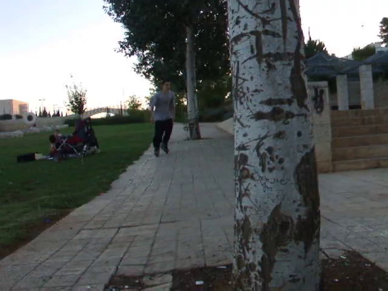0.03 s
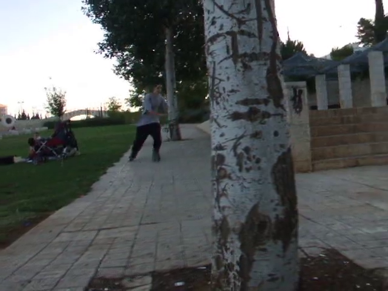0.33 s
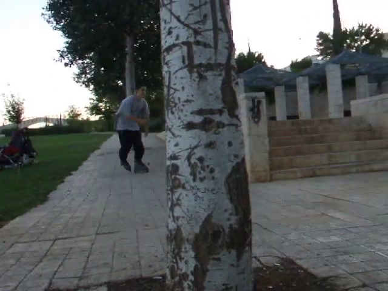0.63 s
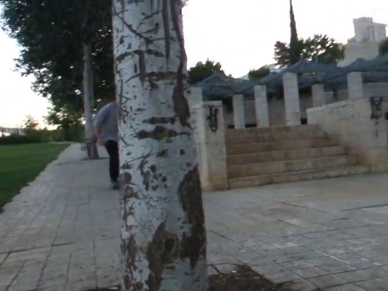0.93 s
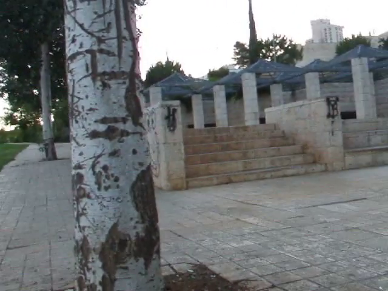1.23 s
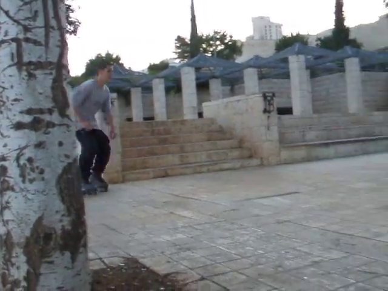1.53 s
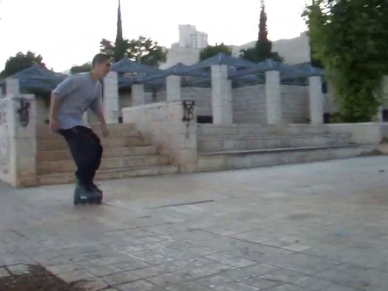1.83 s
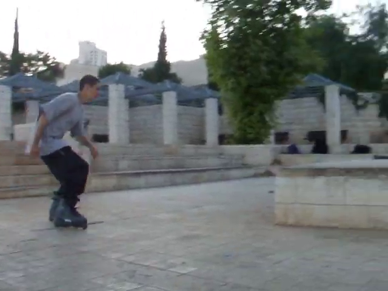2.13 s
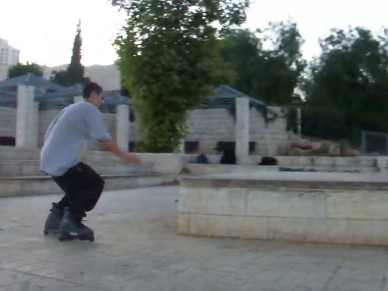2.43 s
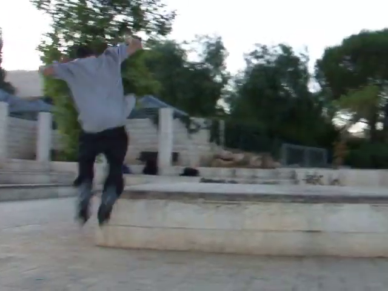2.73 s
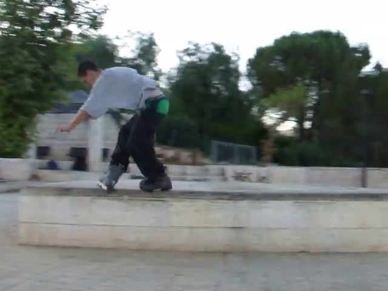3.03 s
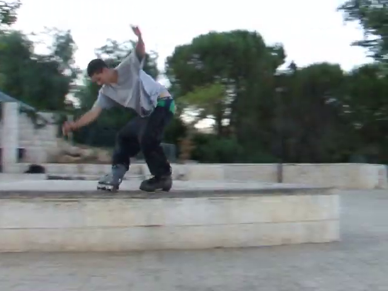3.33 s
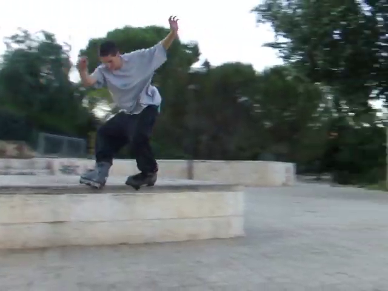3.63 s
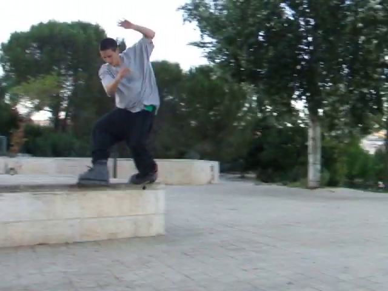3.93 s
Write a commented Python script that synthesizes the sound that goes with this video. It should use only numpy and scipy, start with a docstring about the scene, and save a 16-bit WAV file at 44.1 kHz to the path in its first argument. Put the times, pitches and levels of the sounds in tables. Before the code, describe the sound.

Inline skates roll closer over gritty stone paving, clacking on the joints, then jump, thump onto a stone ledge and scrape along it. Outdoors, light wind gusts rumble on the microphone.

```python
"""Outdoor air and a faint camera whine, then inline skates rolling closer over stone paving.
Wheels rush over grit and clack on the joints, ringing frame and boot; gusts rumble on the microphone.
The skater jumps with a wheel squeak, knocks his skates together and thumps onto a stone ledge.
He grinds along it: tiny slips ring the plastic boots, grit hisses. Low walls answer faintly."""
import sys
import numpy as np
from scipy import signal
from scipy.fft import rfft, irfft, next_fast_len
from scipy.io import wavfile
from scipy.ndimage import map_coordinates

SR = 44100
rng = np.random.default_rng(int(sys.argv[2]) if len(sys.argv) > 2 else 0)


def wav_out(sig):
    """Save sig, one row per channel (or a flat mono array), as 16-bit PCM at SR to the path in sys.argv[1]."""
    wavfile.write(sys.argv[1], SR, np.round(np.clip(np.atleast_2d(sig).T, -1, 1) * 32767).astype(np.int16))


N = 176400

# wind gusts (time [s], half width [s], level [dB])
WIND_GUSTS = [(.6, .085, -28.5), (.89, .07, -36), (1.17, .1, -31), (1.48, .1, -29.5), (2.05, .45, -34),
              (2.44, .06, -24), (2.6, .14, -33)]
# camera tones (frequency [Hz], level [dB])
WHINE_TONES = [(7868, -55.5), (8133, -57)]
# wheel roll envelope (time [s], relative level [dB])
ROLL_ENVELOPE = [(.2, -46.5), (.29, -40), (.76, -44.5), (.83, -36.5), (1.0, -42.5), (1.33, -42),
                 (1.47, -31), (1.55, -40), (1.76, -34), (1.86, -28), (2.01, -38.5), (2.22, -37.5),
                 (2.29, -26), (2.36, -36.5), (2.67, -34), (2.78, -42.5), (3.05, -53.5)]
# light wheel ticks (time [s], relative level [dB])
WHEEL_TICKS = [(.355, -26), (.672, -25), (.863, -19), (1.078, -22), (1.121, -24), (1.217, -21),
               (1.388, -21), (1.459, -19), (1.471, -18), (1.962, -16), (2.162, -17), (2.39, -17.5),
               (2.711, -19), (2.729, -16.5), (2.769, -18.5)]
# dull bumps in the push stroke (time [s], level [dB])
PUSH_BUMPS = [(.562, -30), (.581, -24.5), (.613, -28), (.637, -29), (.701, -27)]
# joints, jump, landing (time [s], base level [dB], knock offset [dB], thud offset [dB])
SKATE_BLOWS = [(0.2662, -20.5, -10.5, -18), (1.8032, -14.5, -30, -13.5), (1.82, -10, -36, -40),
               (1.9016, -18.5, -2, -20), (1.9105, -21.5, 3, -9.5), (2.0453, -15.5, -18, -14),
               (2.139, -11.5, -13, -8.5), (2.1475, -16.5, -5.5, -24), (2.257, -13, -7, -6),
               (2.2674, -21.5, -3, -1), (2.2751, -18.5, -7, -4), (2.8281, -2, -27.5, -36),
               (2.9547, -7, -22, -20.5), (2.9619, -8.5, -12, -37), (2.9949, -7, -25, -19.5),
               (3.0112, -12.5, -39, -32), (3.0229, -4, -28, -25), (3.0374, -9, -18.5, -32)]
# wheel squeaks (time [s], length [s], start pitch [Hz], level [dB])
WHEEL_SQUEAKS = [(2.682, 0.0217, 3120, -20.5)]
# grind envelope (time [s], boot level [dB], hiss level [dB])
GRIND_ENVELOPE = [(2.95, -74, -68), (2.965, -33.5, -33), (3.08, -37, -26), (3.2, -32, -30),
                  (3.38, -35.5, -37), (3.49, -38.5, -44.5), (3.66, -33.5, -40.5), (3.84, -30.5, -37),
                  (4.0, -27.5, -26.5)]
# boots catching on the ledge (time [s], relative level [dB])
LEDGE_CATCHES = [(3.098, -13), (3.11, -14), (3.145, -13.5), (3.345, -10), (3.457, -18), (3.517, -17.5),
                 (3.703, -17), (3.744, -15), (3.897, -16.5), (3.929, -12.5), (3.982, -11.5)]
# weight coming down on the ledge (time [s], level [dB])
LEDGE_THUMPS = [(2.963, -27.5), (2.997, -27.5), (3.024, -24), (3.095, -29)]
# skate frame modes (frequency [Hz], gain [dB])
FRAME_MODES = [(1830, -1.5), (2230, -6), (3450, 1), (4100, 0), (7300, -1)]
# plastic boot resonances (frequency [Hz], bandwidth [Hz], gain [dB])
BOOT_MODES = [(1317, 313, 2.5), (1850, 470, 2.5), (3310, 310, -4), (4000, 410, -11), (5440, 260, -6.5),
              (7100, 730, -9)]
# noise spectra (frequency [Hz], gain [dB])
AIR_SPECTRUM = [(65, 16.5), (130, 11.5), (650, -1.5), (1100, 4), (1850, 5.5), (2700, -6.5), (5000, -9.5),
                (9000, -9.5)]
GUST_SPECTRUM = [(20, -16.5), (80, 0.5), (190, -1), (400, -8.5), (660, -17.5), (4000, -43.5)]
ROLL_SPECTRUM = [(100, 3), (400, 9.5), (1500, 6), (2750, 3), (3350, 6), (4200, 2.5), (7300, 4),
                 (9000, -13.5)]
CRACK_SPECTRUM = [(750, -22), (1700, -2), (2750, -7.5), (5600, 3.5), (9000, -7)]
KNOCK_SPECTRUM = [(400, -29.5), (1350, -2.5), (2050, -3), (2750, -14), (6000, -29)]
THUD_SPECTRUM = [(50, -10), (170, -0.5), (420, -6.5), (800, -9), (2500, -33)]
GRIT_SPECTRUM = [(100, -14), (220, 0), (700, -10.5), (1500, -10.5), (2600, -4.5), (3600, 0.5), (5600, 0),
                 (6400, -3), (7350, 1.5), (9000, -10.5)]
# microphone response (frequency [Hz], gain [dB])
MIC_RESPONSE = [(20, 2.5), (7500, -3), (8250, -7), (8800, -19.5), (9350, -51.5), (10000, -78)]


def amp(db):
    return 10 ** (np.asarray(db) / 20)


def unit_rms(x):
    return x / np.sqrt(np.mean(x ** 2) + 1e-20)


def curves(rows):
    """Per-sample values of each column after the time."""
    times_s, *columns = np.transpose(rows)
    return [np.interp(np.arange(N) / SR, times_s, column) for column in columns]


def wobble(rate_hz):
    """Smooth random curve with knots at rate_hz."""
    return map_coordinates(rng.standard_normal(N // 8), [np.arange(N) * rate_hz / SR], mode="wrap")


def colour(x, spectrum):
    """Minimum-phase filter through the spectrum's points."""
    size = 2 * next_fast_len(len(x) // 2 + 2048)
    hz, db = np.transpose(spectrum)
    gain_db = np.interp(np.log(np.fft.rfftfreq(size, 1 / SR) + 1), np.log(hz), db)
    cepstrum = irfft(np.log(amp(gain_db)))
    cepstrum[1:size // 2] *= 2
    cepstrum[size // 2 + 1:] = 0
    return irfft(rfft(x, size) * np.exp(rfft(cepstrum)))[:len(x)]


def add(out, time_s, x, db):
    """Mix x in; db is its level with the energy spread over 10 ms."""
    start = round(time_s * SR)
    part = out[start:start + len(x)]
    part += (amp(db) * x / np.linalg.norm(x) * np.sqrt(SR / 100))[:len(part)]


def wind(lumpy_db=2, air_db=-36.5):
    """Steady outdoor air; lumpy gusts swell and fade on the microphone."""
    t = np.arange(N) / SR
    power = sum(amp(db) ** 2 * np.exp(-((t - time_s) / width_s) ** 2)
                for time_s, width_s, db in WIND_GUSTS)
    strength = np.sqrt(power) * amp(lumpy_db * wobble(70))
    gusts = strength * unit_rms(colour(rng.standard_normal(N), GUST_SPECTRUM))
    air = amp(air_db) * unit_rms(colour(rng.standard_normal(N), AIR_SPECTRUM))
    return gusts + air


def whine(waver_hz=10):
    """Thin wavering camera tones."""
    out = np.zeros(N)
    for hz, db in WHINE_TONES:
        phase = 2 * np.pi * np.cumsum(hz + waver_hz * wobble(66)) / SR
        out += amp(db) * unit_rms(np.sin(phase))
    return out


def grains(rate_hz, spread_db, rush):
    """Tiny random contacts of uneven size over a smooth rush."""
    sizes = rng.standard_normal(N) * amp(spread_db * np.clip(rng.standard_normal(N), -2, 2))
    contacts = sizes * (rng.random(N) < rate_hz / SR)
    return unit_rms(contacts) + rush * rng.standard_normal(N)


def wheels(roll_gain_db=1, tick_gain_db=-10, flutter_db=2.54):
    """Wheels roll over grit, bump, and tick on joints; ticks ring only the upper frame modes."""
    roll_db = curves(ROLL_ENVELOPE)[0] + roll_gain_db + flutter_db * wobble(70)
    grit = grains(rate_hz=1200, spread_db=2.0, rush=0.66)
    out = amp(roll_db) * unit_rms(colour(grit, ROLL_SPECTRUM))
    for time_s, db in WHEEL_TICKS:
        add(out, time_s, clack(FRAME_MODES[2:], ring_db=rng.normal(-7, 4)), db + tick_gain_db)
    for time_s, db in PUSH_BUMPS:
        add(out, time_s, colour(burst(t60_s=0.025), THUD_SPECTRUM), db)
    return out


def burst(t60_s, snap=0, snap_t60_s=0.0011, rattle_db=-23, rattle_t60_s=0.11):
    """Rough contact: fast decay, optional opening snap, weak trailing rattle."""
    t = np.arange(SR // 8) / SR
    envelope = amp(-60 * t / t60_s) + snap * amp(-60 * t / snap_t60_s)
    envelope += amp(rattle_db - 60 * t / rattle_t60_s)
    return rng.choice([-1, 1], len(t)) * envelope


def frame_ring(modes, t60_s=0.013, detune=0.025, spread_db=2):
    """Struck frame modes decay; tuning and weight vary per contact."""
    t = np.arange(SR // 8) / SR
    tones = np.zeros(len(t))
    for hz, db in modes:
        weight = amp(db + spread_db * rng.normal())
        tuned_hz = hz * rng.normal(1, detune)
        tones += weight * np.sin(2 * np.pi * (tuned_hz * t + rng.random()))
    return unit_rms(tones * amp(-60 * t / t60_s))


def clack(modes, ring_db=0):
    """Crack on stone plus frame ring."""
    ring = amp(ring_db) * frame_ring(modes)
    crack = colour(burst(t60_s=0.0092, snap=0.9), CRACK_SPECTRUM)
    return ring + unit_rms(crack)


def blows(clack_gain_db=-9, knock_gain_db=1):
    """Each hard blow clacks, knocks the boot and thuds through the wheels."""
    out = np.zeros(N)
    for time_s, db, knock_db, thud_db in SKATE_BLOWS:
        add(out, time_s, clack(FRAME_MODES), db + clack_gain_db)
        add(out, time_s, colour(burst(t60_s=0.017), KNOCK_SPECTRUM), db + knock_db + knock_gain_db)
        add(out, time_s, colour(burst(t60_s=0.028), THUD_SPECTRUM), db + thud_db)
    return out


def walls(x, t60_s=0.32, onset_s=0.0059):
    """Short diffuse reflections off low walls."""
    t = np.arange(SR // 2) / SR
    tail = rng.standard_normal(len(t)) * amp(-60 * t / t60_s) * (1 - np.exp(-t / onset_s))
    return signal.fftconvolve(x, tail / np.linalg.norm(tail))[:N]


def squeaks(rise=0.3, roughness=0.12):
    """Wheels scuff and chirp upward at take-off."""
    out = np.zeros(N)
    for time_s, length_s, start_hz, db in WHEEL_SQUEAKS:
        progress = np.linspace(0, 1, int(length_s * SR))
        pitch_hz = start_hz * (1 + rise * progress + roughness * wobble(1900)[:len(progress)])
        phase = 2 * np.pi * np.cumsum(pitch_hz) / SR
        tone = np.sin(phase) / 2 + np.sin(2 * phase)
        add(out, time_s, np.sin(np.pi * progress) ** 2 * tone, db)
    return out


def boot(x):
    """Broad resonances of the plastic boot and frame."""
    f = np.fft.rfftfreq(2 * len(x), 1 / SR)
    response = sum((-1) ** k * amp(db) * 1j * f * width_hz / (hz * hz - f * f + 1j * f * width_hz)
                   for k, (hz, width_hz, db) in enumerate(BOOT_MODES))
    return irfft(rfft(x, 2 * len(x)) * response)[:len(x)]


def grind(spread_db=3.6, flutter_db=2.8, catch_gain_db=-14, ring_gain_db=-14):
    """Boots scrape the ledge: slips ring the plastic, grit hisses, catches ring the lowest frame mode."""
    boot_db, hiss_db = curves(GRIND_ENVELOPE)
    pressure_db = flutter_db * wobble(130)
    slips = grains(rate_hz=2700, spread_db=spread_db, rush=0.27)
    grit = grains(rate_hz=2000, spread_db=spread_db, rush=0.38)
    out = amp(boot_db + pressure_db) * unit_rms(boot(slips))
    out += amp(hiss_db + pressure_db / 2) * unit_rms(colour(grit, GRIT_SPECTRUM))
    for time_s, db in LEDGE_CATCHES:
        add(out, time_s, boot(burst(t60_s=0.017)), db + catch_gain_db)
        add(out, time_s, frame_ring(FRAME_MODES[:1]), db + ring_gain_db)
    return out


def landing(centre_hz=185, detune=0.064, t60_s=0.036):
    """The skater's weight thumps through the boots into the ledge."""
    out = np.zeros(N)
    t = np.arange(SR // 8) / SR
    for time_s, db in LEDGE_THUMPS:
        hz = centre_hz * np.exp(rng.normal(0, detune))
        add(out, time_s, np.sin(2 * np.pi * hz * t) * amp(-60 * t / t60_s), db)
    return out


def scene(walls_db=-13.5):
    """Skates, wall reflections, wind and whine."""
    skates = blows() + wheels() + squeaks() + landing() + grind()
    return skates + amp(walls_db) * walls(skates) + wind() + whine()


def record(dry, start_s=0.036, ceiling=0.7, cutoff_hz=16000):
    """Narrow-band mono microphone: silent until start_s, peaks clipped, then low-passed."""
    live = np.arange(N) / SR > start_s
    clipped = np.clip(colour(dry, MIC_RESPONSE) * live, -ceiling, ceiling)
    lowpass = signal.ellip(10, .1, 80, cutoff_hz, fs=SR, output="sos")
    return signal.sosfilt(lowpass, clipped)[None]


dry = scene()
out = record(dry)
wav_out(out)
```